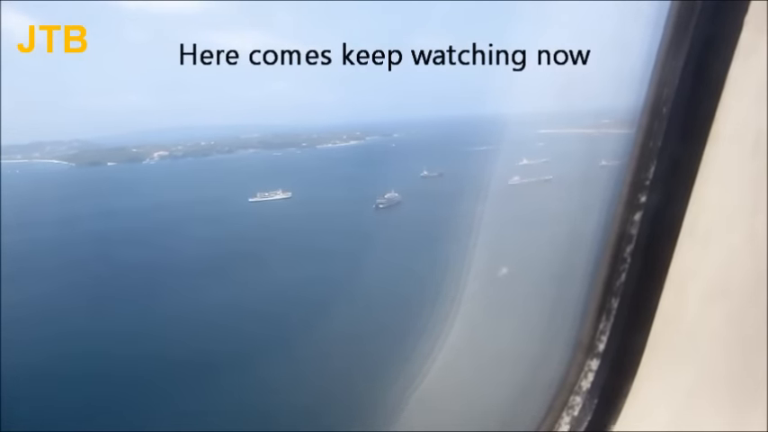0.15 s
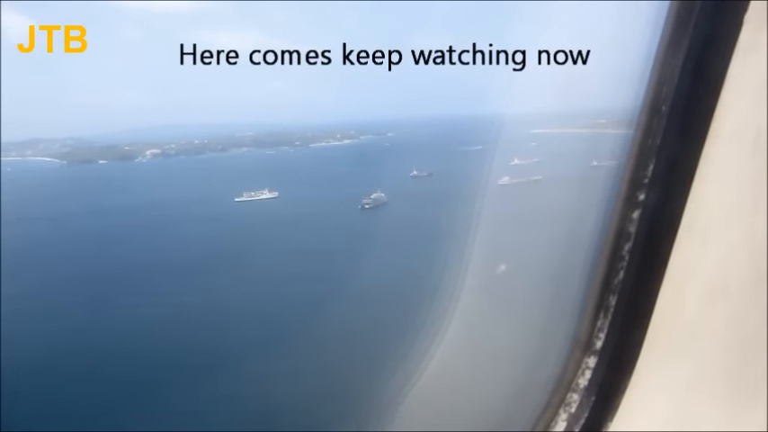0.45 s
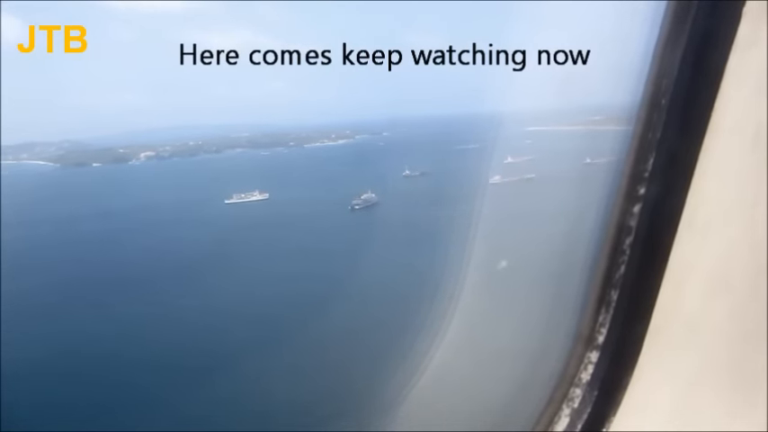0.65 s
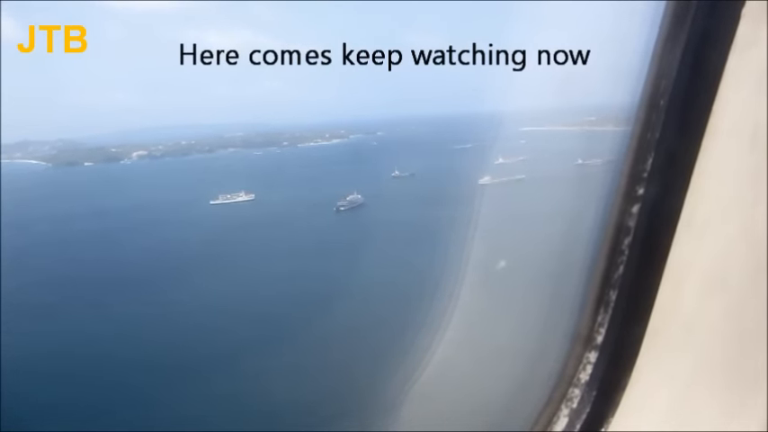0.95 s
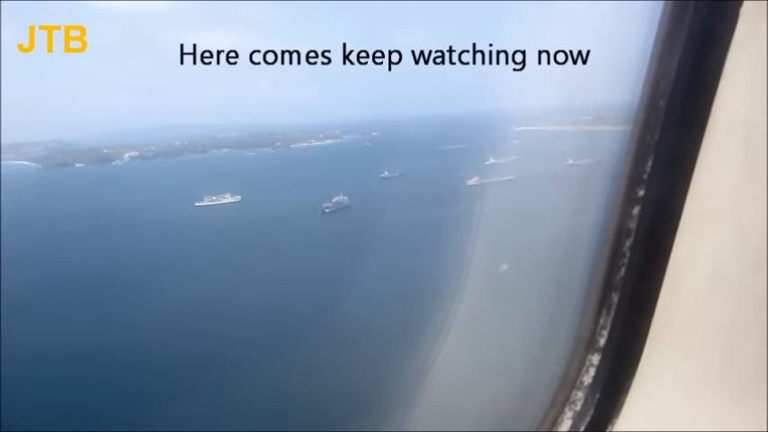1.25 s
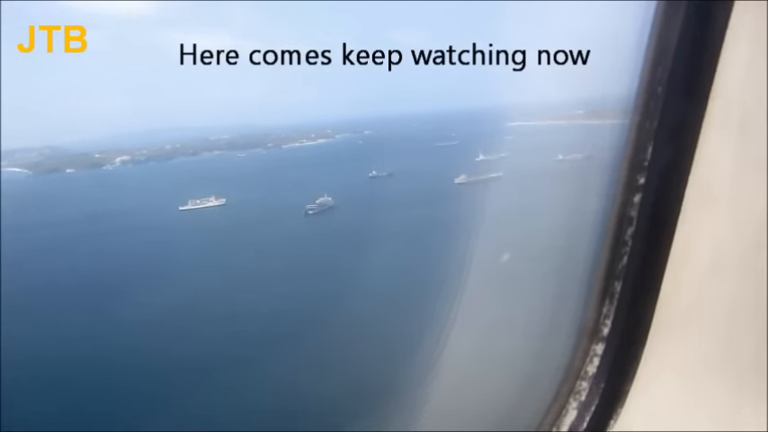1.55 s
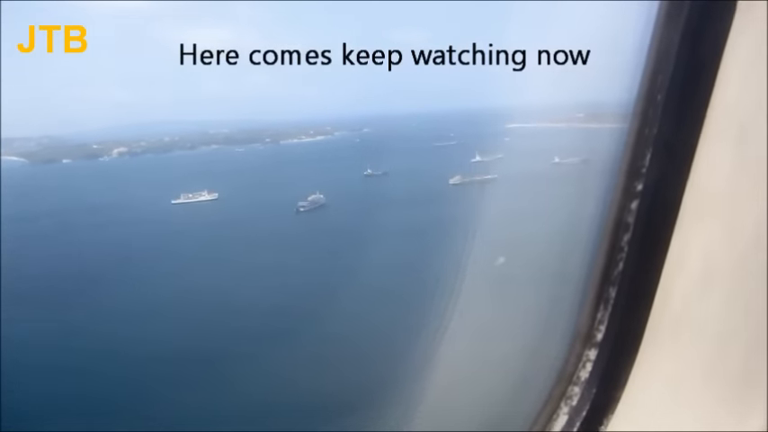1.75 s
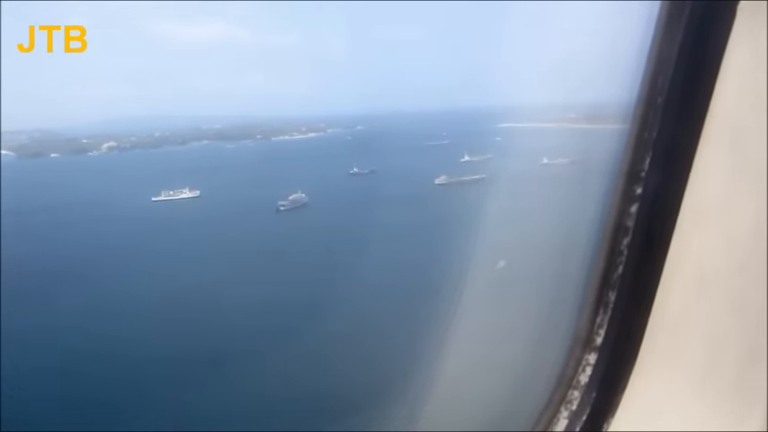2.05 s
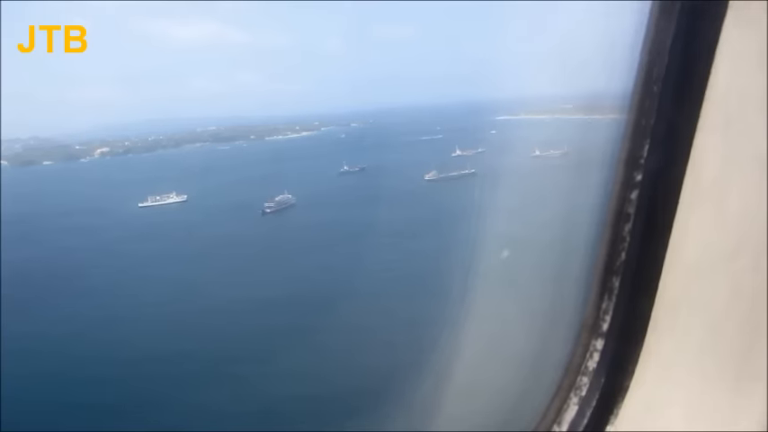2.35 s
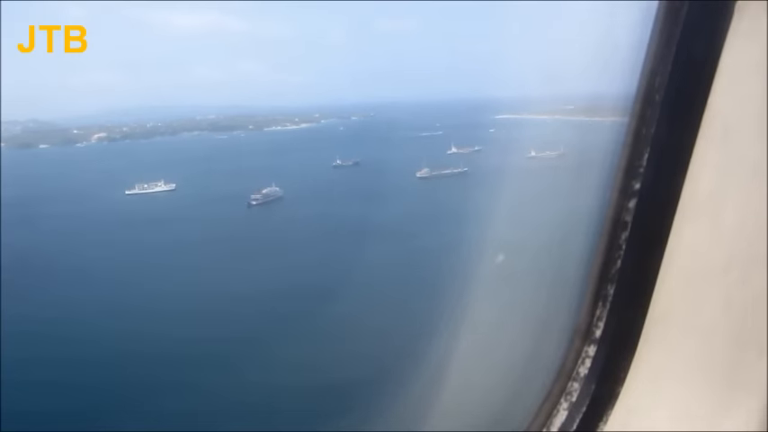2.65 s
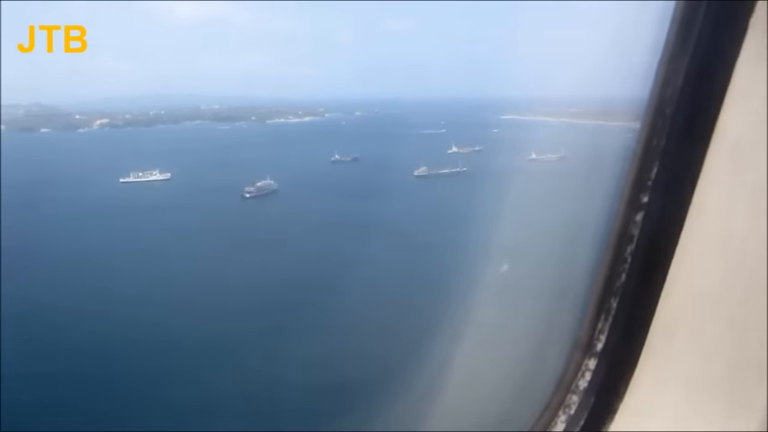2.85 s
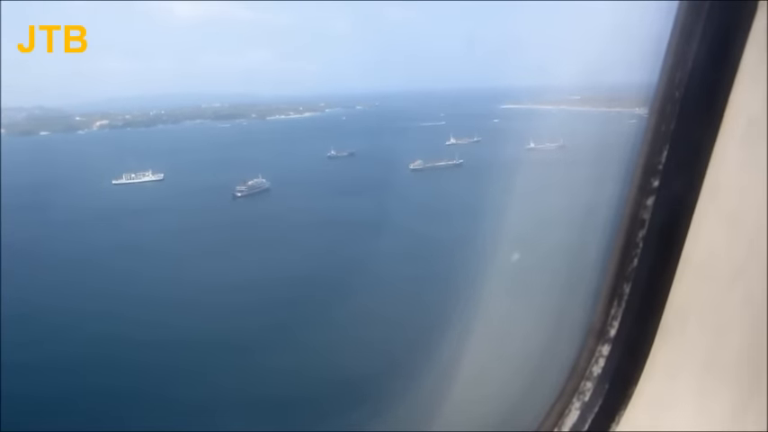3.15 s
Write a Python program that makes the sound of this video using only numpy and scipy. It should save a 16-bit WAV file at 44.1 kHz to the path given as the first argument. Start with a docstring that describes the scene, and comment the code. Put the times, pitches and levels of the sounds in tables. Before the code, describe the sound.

Steady propeller drone inside an aircraft cabin, with low rumble, rushing air and faint whine.

```python
"""Turboprop cabin on descent

From a window seat, on a stereo microphone. The propellers drone at their blade rate over a low,
wavering rumble and the rush of air along the fuselage. Thin turbine whines flutter at the blade
rate, and near the end the cabin trim ticks once."""
import sys
import numpy as np
from scipy.fft import rfft, irfft, next_fast_len
from scipy.io import wavfile
from scipy.ndimage import uniform_filter1d, map_coordinates

SR = 44100
rng = np.random.default_rng(int(sys.argv[2]) if len(sys.argv) > 2 else 0)


def inscribe(sig):
    """Save sig as 16-bit PCM at rate SR to the path in sys.argv[1].

    A 1-D sig is mono; a 2-D sig holds one channel per row.
    Samples are clipped to [-1, 1] before scaling.
    """
    pcm = np.round(np.clip(np.atleast_2d(sig).T, -1, 1) * 32767)
    wavfile.write(sys.argv[1], SR, pcm.astype(np.int16))


N = 145530

# Propeller blades passing. Each row: time in seconds, rate in Hz.
BLADE_HZ = [(0, 120.15), (1.2, 120.3), (2.4, 120.3), (2.8, 119.6), (3.3, 120)]
# The blade tone at the seat. Each row: time in seconds, relative level in dB.
BLADE_LEVEL = [(0.0, -20.5), (0.32, -20.5), (0.8, -23), (0.9, -21.5), (1.19, -21), (1.34, -24.5),
               (1.55, -20), (1.63, -23), (2.12, -20.5), (2.25, -22.5), (2.6, -18.5), (2.92, -21.5),
               (3.13, -19.5), (3.29, -23)]
# The octave above it. Each row: time in seconds, relative level in dB.
BLADE_OCTAVE_LEVEL = [(0.0, -30.5), (0.12, -32.0), (1.39, -31), (1.67, -42), (2.14, -32.5), (2.62, -32.5),
                      (2.73, -40.4), (2.8, -48), (3.07, -32), (3.29, -33.5)]
# Colour of the rumble. Each row: frequency in Hz, relative level in dB.
RUMBLE_SPECTRUM = [(20, -21), (35, -16), (48, -12), (60, -4), (70, 0), (78, -6), (92, -16), (130, -40),
                   (300, -120)]
# Level of the low rumble. Each row: time in seconds, relative level in dB.
RUMBLE_LEVEL = [(0.0, -41.5), (0.27, -32.1), (0.48, -41.9), (0.59, -28.8), (0.8, -39.7), (0.86, -30.4),
                (0.99, -42.6), (1.19, -33.6), (1.41, -41.2), (1.52, -35.3), (1.7, -32.9), (1.9, -38.6),
                (2.07, -30.1), (2.35, -35.9), (2.8, -36.3), (2.93, -39.5), (3.17, -36.8), (3.29, -44.6)]
# Swell of the air outside. Each row: time in seconds, relative level in dB.
AIRFLOW_LEVEL = [(0, -38.5), (.7, -39), (1.1, -38.5), (1.55, -36.5), (2.1, -36), (2.55, -38), (2.88, -40.5),
                 (3.3, -40)]
# Its dull rush, heard from inside. Each row: frequency in Hz, relative level in dB.
RUSH_SPECTRUM = [(20, -31), (70, -16), (100, 2), (138, 7.5), (162, 0), (190, 2.5), (225, -1.5), (350, 0),
                 (440, -3), (540, -8), (660, -8.5), (720, -13), (850, -11.5), (910, -17), (1020, -15.5),
                 (1200, -21.5), (1560, -22), (2000, -27.5), (2550, -32.5), (3050, -33.5), (3300, -40.5),
                 (4200, -46.5), (6000, -40), (15000, -109)]
# Its thin hiss. Each row: frequency in Hz, relative level in dB.
HISS_SPECTRUM = [(1000, -60), (2500, -25), (4000, -11.5), (4850, -10), (5300, -4.5), (6300, -3), (6600, -5),
                 (7000, -2), (8000, -3), (9400, -3), (10100, 1), (10600, .5), (11500, 2), (12300, 0),
                 (13200, -5.5), (15000, -11), (15700, -18)]
# Drift of the turbines. Each row: time in seconds, speed as a ratio to nominal.
TURBINE_SPEED = [(0, 1.003), (.6, 1.0003), (1.7, .9985), (2.5, 1), (3.3, 1.0015)]
# The clearest whine. Each row: time in seconds, relative level in dB.
CLEAR_WHINE_LEVEL = [(0, -63.5), (.25, -65.5), (.6, -72), (1.4, -73), (1.8, -68), (2.1, -73), (3.3, -72)]
# Lower whines, most about a blade rate apart. Each row: nominal pitch in Hz, relative level in dB.
LOW_CLUSTER = [(5233, -80), (5355, -84), (5475, -83), (5609, -79), (5835, -76), (5922, -75), (5960, -76),
               (6081, -77), (6200, -84), (6320, -82)]
# Their rise and fall together. Each row: time in seconds, relative level in dB.
LOW_CLUSTER_LEVEL = [(0, -65), (.45, -68), (.95, -67), (1.2, -63), (1.55, -63), (1.9, -65), (2.05, -62),
                     (2.3, -66), (2.55, -64), (2.82, -69), (3.3, -62.5)]
# Upper whines. Each row: nominal pitch in Hz, relative level in dB.
HIGH_CLUSTER = [(11300, -80), (11423, -76), (11550, -80), (11674, -74), (11804, -72), (11925, -79),
                (12047, -78)]
# Noise around each cluster. Each row: centre in Hz, Gaussian width in Hz, relative level in dB.
CLUSTER_HALOS = [(5930, 280, -66), (11500, 180, -64.5)]
# Colour of the tick. Each row: frequency in Hz, relative level in dB.
TICK_SPECTRUM = [(300, -12), (900, -4), (1600, 0), (2400, -6), (3400, -17), (4500, -14), (7000, -25),
                 (14000, -36)]
# How alike noise is on the microphone's two sides. Each row: frequency in Hz, correlation from 0 to 1.
MIC_COHERENCE = [(60, .995), (250, .985), (600, .95), (1200, .88), (2400, .66), (4000, .55), (6000, .6),
                 (8000, .4), (12000, .22)]
# Balance at the microphone. Each row: frequency in Hz, left minus right in dB.
MIC_BALANCE = [(25, -8), (60, -6), (120, -3), (400, -1.3), (700, .4), (1300, -.3), (2400, .6), (4400, -1),
               (8000, -2), (10200, -4), (12500, -1.8)]
# Phase across the microphone. Each row: frequency in Hz, lead of the left side in radians.
MIC_PHASE = [(30, 1.3), (60, -3.23), (120, .73), (400, 0.4), (700, 0.091), (1200, -0.16), (2400, -0.36),
             (5000, -0.033)]


def amp(db):
    """Decibels to gain."""
    return 10 ** (np.asarray(db) / 20)


def unit(x):
    """Scale to rms 1."""
    return x / np.sqrt(np.mean(np.abs(x) ** 2) + 1e-20)


def along(points, hz):
    """Read (Hz, value) points on a log axis."""
    f, v = np.transpose(points)
    return np.interp(np.log(hz + 1), np.log(f + 1), v)


def curve(points):
    """Read (seconds, value) points at every sample."""
    return np.interp(np.arange(N) / SR, *np.transpose(points))


def wobble(rate):
    """A smooth random curve, rate knots a second."""
    return map_coordinates(rng.standard_normal(N // 20), [np.arange(N) * rate / SR], mode="wrap")


def running_phase(hz):
    """Phase in radians of a frequency curve."""
    return 2 * np.pi * np.cumsum(hz) / SR


def filtered(x, response):
    """Pass x through a frequency response."""
    size = next_fast_len(N + SR // 2)
    return irfft(rfft(x, size) * response(np.fft.rfftfreq(size, 1 / SR)), size)[..., :N]


def noise(gain):
    """Stereo noise of rms 1: alike on both sides in the bass, diffuse in the treble."""
    def mid_side_gain(hz):
        angle = np.arccos(along(MIC_COHERENCE, hz)) / 2
        return gain(hz) * [np.cos(angle), np.sin(angle)]
    mid, side = filtered(rng.standard_normal((2, N)), mid_side_gain)
    return unit(np.array([mid + side, mid - side]))


def shaped(spectrum):
    """Stereo noise with a given spectrum."""
    return noise(lambda hz: amp(along(spectrum, hz)))


def tone(phase, blur_rad, fade_db):
    """A tone of rms 1 that wanders a little in level and phase."""
    fading = amp(fade_db * wobble(7.33))
    return unit(fading * np.sin(phase + 2 * wobble(3.6) + blur_rad * wobble(45)))


def propellers(blade_phase):
    """The passing blades drone with two overtones; the octave fades away twice and returns."""
    waver_db = .08 * wobble(16)
    fundamental = amp(curve(BLADE_LEVEL) + 1 + waver_db) * np.cos(blade_phase - 1)
    octave = amp(curve(BLADE_OCTAVE_LEVEL) - .67) * np.cos(2 * blade_phase + .5)
    third = amp(-51.5) * tone(3 * blade_phase, blur_rad=.4, fade_db=3)
    return np.sqrt(2) * (fundamental + octave) + third


def rumble(evenness=.65):
    """Low cabin rumble whose level wavers at random."""
    low = shaped(RUMBLE_SPECTRUM)
    power = np.abs(uniform_filter1d(low.mean(0) ** 2, SR // 20)) + 1e-6
    evened = unit(low / power ** (evenness / 2))  # even out the noise, then apply the level curve
    return amp(curve(RUMBLE_LEVEL) + .3) * evened


def airflow(mean_db, swell_db, bass_share=.54, hiss_share=.9):
    """Air along the fuselage: a dull rush swells; its bass and a thin hiss follow by a share."""
    rush = shaped(RUSH_SPECTRUM)
    bass = filtered(rush, lambda hz: 1 / (1 + (hz / 280) ** 4))
    body = amp(swell_db) * (rush - bass) + amp(bass_share * swell_db) * bass
    hiss = amp(hiss_share * swell_db) * shaped(HISS_SPECTRUM)
    return amp(mean_db) * (amp(7.5) * body + amp(-19) * hiss)


def whine_cluster(whines, halo, phase_per_hz, diffuse=.6):
    """Turbine whines in a halo of noise, each partly different on the microphone's two sides."""
    centre_hz, width_hz, halo_db = halo
    cluster = amp(halo_db) * noise(lambda hz: np.exp(-.5 * ((hz - centre_hz) / width_hz) ** 2))
    for hz, db in whines:
        shared, left, right = [tone(hz * phase_per_hz, blur_rad=1, fade_db=1.5) for _ in range(3)]
        cluster += amp(db) * (shared + diffuse * np.array([left, right]))
    return cluster


def turbines(blade_phase, swell_db, clear_hz=5722, hum_hz=979.8, flutter=.3, sharpness=4):
    """Whines that flutter at the blade rate and a faint hum, all pitched by the turbine speed."""
    phase_per_hz = running_phase(curve(TURBINE_SPEED))
    whines = amp(curve(CLEAR_WHINE_LEVEL)) * tone(clear_hz * phase_per_hz, blur_rad=.45, fade_db=1)
    low = whine_cluster([(hz, db + 1.8) for hz, db in LOW_CLUSTER], CLUSTER_HALOS[0], phase_per_hz)
    high = whine_cluster([(hz, db + 3.3) for hz, db in HIGH_CLUSTER], CLUSTER_HALOS[1], phase_per_hz)
    low_db = curve(LOW_CLUSTER_LEVEL)
    whines = whines + amp(low_db - low_db.mean()) * low + amp(swell_db) * high
    pulses = unit(np.exp(sharpness * np.cos(blade_phase)))
    hum = amp(-56.5) * tone(hum_hz * phase_per_hz, blur_rad=.35, fade_db=2)
    return whines * unit(1 + flutter * pulses) + hum


def trim_tick(start_s=2.9692, t60_s=.02):
    """One dry tick of the cabin trim: a burst of noise that dies at once."""
    age_s = np.arange(N) / SR - start_s
    return amp(-38 - 60 * np.abs(age_s) / t60_s) * (age_s > 0) * shaped(TICK_SPECTRUM)


def window_seat(hz):
    """Response at the microphone: in the bass the left is weaker and out of step with the right."""
    sides = np.array([[.5], [-.5]])
    return amp(sides * along(MIC_BALANCE, hz)) * np.exp(1j * sides * along(MIC_PHASE, hz))


def scene():
    """The whole cabin as it reaches the microphone at the seat."""
    blade_phase = running_phase(curve(BLADE_HZ))
    flow_db = curve(AIRFLOW_LEVEL)
    swell_db = flow_db - flow_db.mean()
    cabin = propellers(blade_phase) + rumble() + airflow(flow_db.mean(), swell_db)
    cabin += turbines(blade_phase, swell_db) + trim_tick()
    return filtered(cabin, window_seat)


def record(dry, fade_s=.012, top_hz=15550):
    """Soft ends, and nothing above the recorder's band limit."""
    edge_s = np.minimum(np.arange(N), np.arange(N)[::-1]) / SR
    return filtered(dry * np.minimum(edge_s / fade_s, 1), lambda hz: hz < top_hz)


dry = scene()
out = record(dry)
inscribe(out)
```